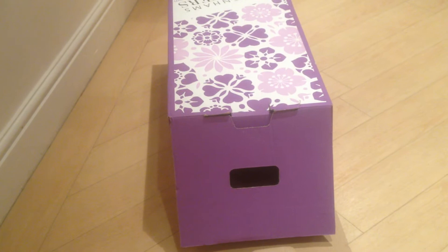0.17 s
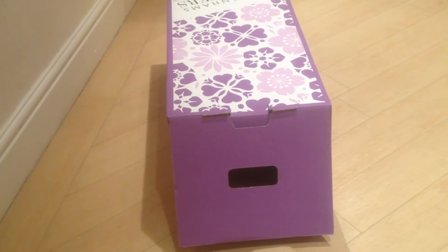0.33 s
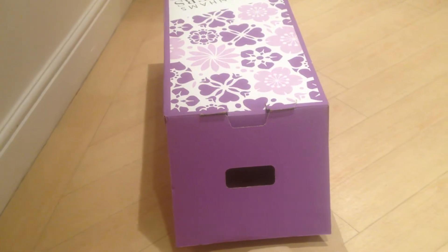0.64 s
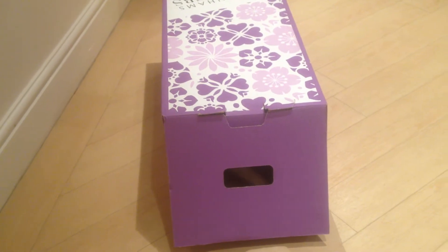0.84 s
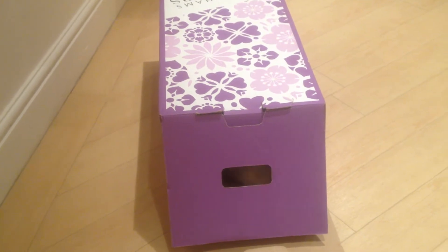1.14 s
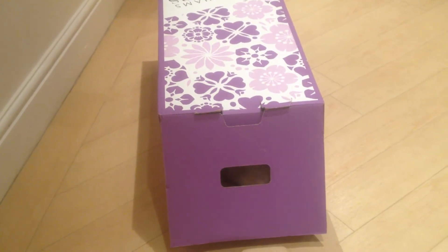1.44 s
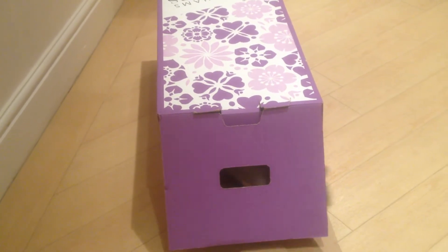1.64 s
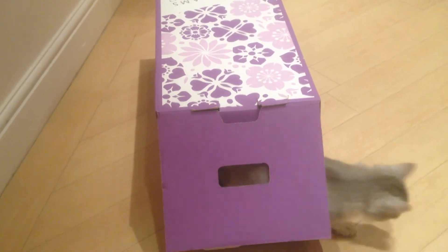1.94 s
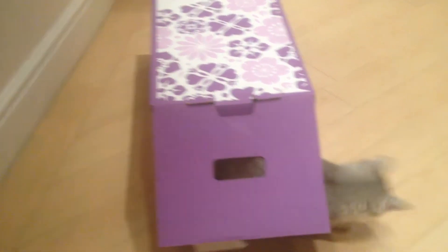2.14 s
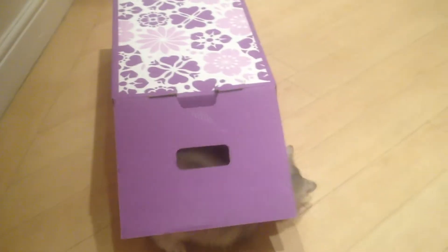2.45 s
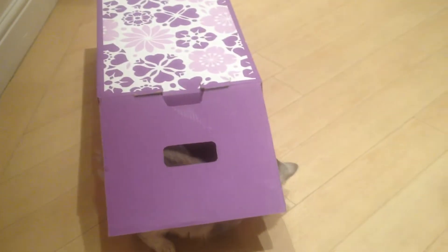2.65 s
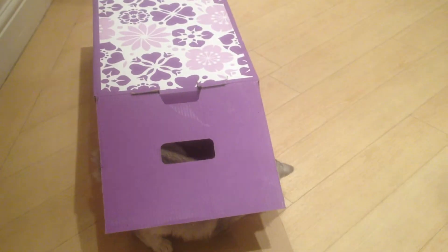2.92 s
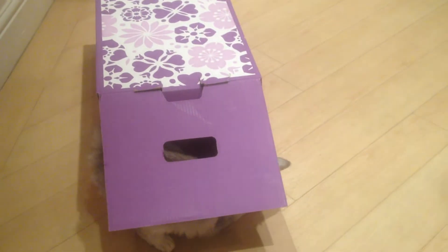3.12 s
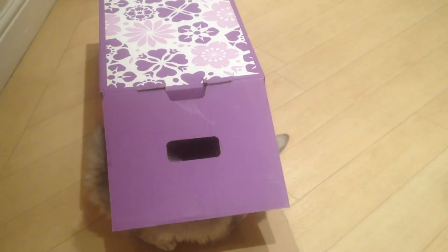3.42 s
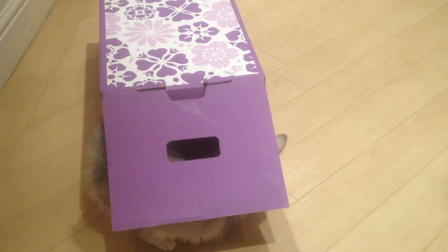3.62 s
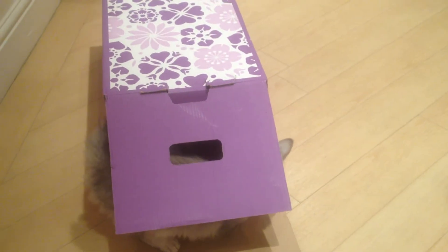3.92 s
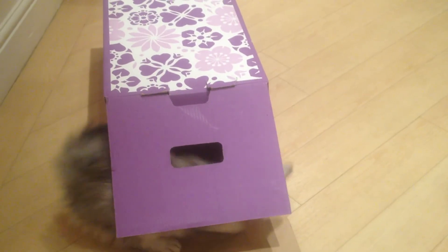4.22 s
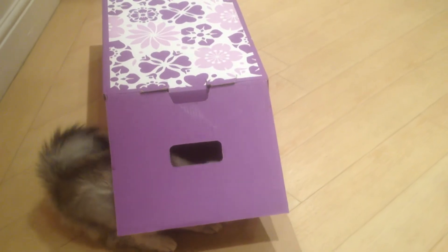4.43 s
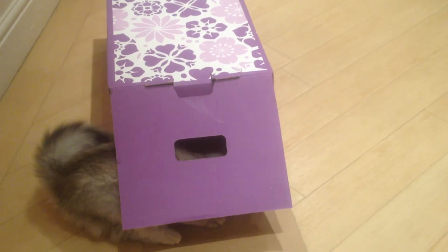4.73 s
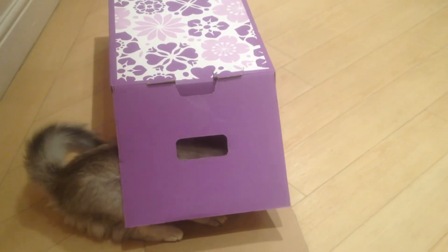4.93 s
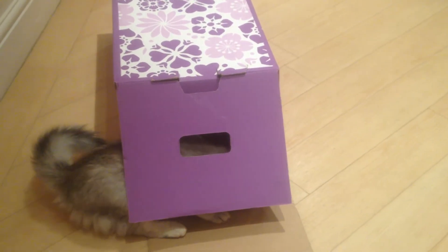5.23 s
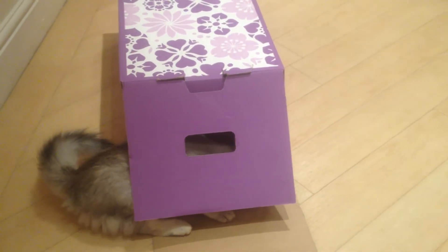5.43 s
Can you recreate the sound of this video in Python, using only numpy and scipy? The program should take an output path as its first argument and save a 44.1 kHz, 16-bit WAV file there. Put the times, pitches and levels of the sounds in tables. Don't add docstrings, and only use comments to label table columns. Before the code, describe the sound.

A cat scuffs and bumps a hollow cardboard box on a wooden floor, with claw ticks and scratches over a faint low hum.

```python
import sys
import numpy as np
from scipy import signal
from scipy.fft import rfft, irfft, next_fast_len
from scipy.io import wavfile

SR = 44100
rng = np.random.default_rng(int(sys.argv[2]) if len(sys.argv) > 2 else 0)


def generate_wav(sig):
    pcm = np.round(np.clip(np.atleast_2d(sig).T, -1, 1) * 32767).astype(np.int16)
    wavfile.write(sys.argv[1], SR, pcm)


def volts(x):
    e = np.asarray(x, float) / 20
    return 10 ** e


N = 245501

# (f/Hz, level/dB, t60/s)
CARD = [(528, -4, .06), (840, -4, .045), (1190, -2, .035), (1265, -4, .03), (2260, -3, .025),
        (2750, -2, .025)]
LIGHT_MOVE_DB = -60
CONTROL_STEP = 8


def in_time(rows):
    s, *columns = np.transpose(rows)
    return [np.interp(np.arange(N) / SR, s, column) for column in columns]


def at_hz(points, hz):
    point_hz, value = np.transpose(points)
    return np.interp(np.log(hz + 1e-9), np.log(point_hz), value)


def rms_one(x):
    return x / np.sqrt(np.mean(x ** 2) + 1e-20)


def band(x, low_hz, high_hz):
    edges = [low_hz, min(high_hz, .45 * SR)]
    return signal.sosfilt(signal.butter(2, edges, "band", fs=SR, output="sos"), x)


def resonance(x, hz, width_hz):
    r = np.exp(-np.pi * width_hz / SR)
    feed = np.array([1, 0, -1]) * (1 - r * r) / 2
    return signal.lfilter(feed, [1, -2 * r * np.cos(2 * np.pi * hz / SR), r * r], x)


def drift(rate_hz):
    r = np.exp(-2 * np.pi * rate_hz / SR)
    wander = signal.lfilter([1], [1, -2 * r, r * r], rng.standard_normal(N + SR))
    return rms_one(wander[SR:])


def dying(t60, size=8192):
    return volts(-60 * np.arange(size) / SR / max(t60, 1e-3))


def add(out, s, sound, db):
    i = round(s * SR)
    out[i:i + len(sound)] += (volts(db) * sound / np.abs(sound).max())[:N - i]


def note(hz, t60):
    return dying(t60) * np.sin(2 * np.pi * hz * np.arange(8192) / SR)


def struck(modes, pitch=1):
    strengths_db = 2.5 * rng.standard_normal(len(modes))
    return sum(volts(db + own_db) * note(hz * pitch, t60)
               for (hz, db, t60), own_db in zip(modes, strengths_db))


def crack(t60):
    return band(rng.standard_normal(8192) * dying(t60), 4000, 11500)


def grains(per_s, spread_db):
    sizes = volts(spread_db * np.minimum(rng.exponential(1, N), 4)) * rng.choice([-1, 1], N)
    clicks = sizes * (rng.random(N) < per_s / SR)
    return rms_one(clicks * volts(1.2 * drift(40)))


def walls(x):
    # (f/Hz, width/Hz, level/dB)
    wall_modes = [(300, 37, 15), (583, 16, 1), (910, 360, -7.5), (1082, 6.7, 6), (1300, 51, -6),
                  (1530, 17, 8), (1760, 20, -41), (1770, 5.4, -29), (2580, 590, -9), (2790, 22, -23)]
    narrowest_hz = 60
    return sum((-1) ** k * volts(db) * resonance(x, hz, max(width, narrowest_hz))
               for k, (hz, width, db) in enumerate(wall_modes))


def echoed(x):
    # (lag/s, level/dB)
    floor_echoes = [(.0034, -6), (.0065, -12)]
    return x + sum(volts(db) * np.roll(x, round(lag * SR)) for lag, db in floor_echoes)


def background():
    # (f/Hz, level per Hz/dB)
    air_spectrum = [(40, -54), (64, -26), (110, -20), (250, -15), (370, -21), (500, -18.5), (660, -29),
                    (1050, -28), (1550, -30), (2700, -31.5), (5000, -38), (9000, -43), (11000, -50.5),
                    (15500, -42.5)]
    # (f/Hz, width/Hz, level/dB)
    room_modes = [(82.8, 8.4, -72), (132.5, 24, -64.5), (206.5, 29, -66.5), (219.9, 5.4, -72),
                  (287.5, 47, -61.5), (350.8, 7.1, -74)]
    # (f/Hz, rms level/dB, wander/Hz)
    hum_lines = [(277.7, -54.5, 4.06), (1398, -79, 4.6), (1517, -74.5, 10), (1540, -76.5, 14.05)]
    air_db, flutter_db = -63.5, 0.9
    size = next_fast_len(N)
    hz = np.arange(size // 2 + 1) * SR / size
    white = rfft(rng.standard_normal(size))
    air = irfft(white * volts(at_hz(air_spectrum, hz)), size)[:N]
    out = volts(air_db) * air / np.std(band(air, 357, 14000))
    for mode_hz, width, db in room_modes:
        rumble = resonance(rng.standard_normal(N), mode_hz, width)
        out = out + volts(db) * rms_one(resonance(rumble, mode_hz, width))
    for line_hz, db, wander in hum_lines:
        phase = 2 * np.pi * np.cumsum(line_hz + wander * 0.287 * drift(5.28)) / SR
        out = out + np.sqrt(2) * volts(db + flutter_db * drift(5.9)) * np.sin(phase)
    return out


def moves():
    # (t/s, level/dB, speed/0-1)
    stir = [(0.9, -77, 0.5), (1.14, -62, 0.35), (1.35, -67, 0.1), (1.69, -62.5, 0.54), (1.9, -60.5, 0.4),
            (2.13, -65.5, 0.48), (2.32, -56.5, 0.54), (2.43, -63, 0.8), (2.84, -63.5, 0.12),
            (3.19, -61.5, 0.6), (3.72, -61, 0.44), (4.03, -82, 0.63), (4.28, -62.5, 0.63),
            (4.7, -72.5, 0.5), (4.74, -52.5, 0.22), (5.16, -52.5, 0.44), (5.32, -64, 0.5),
            (5.567, -89, 0.8)]
    # (t/s, peak/dB, t60/s, weight on the walls/dB, speed/0-1)
    shoves = [
        (1.172, -43, 0.72, -1.5, 0.3),
        (1.36, -42.5, 0.43, 5, 0.57),
        (2.437, -45, 0.24, 0, 1),
        (2.466, -55.5, 0.81, 5, 1),
        (2.628, -50, 0.91, 0.5, 0.08),
        (3.226, -47, 0.45, 13.5, 0.63),
        (4.719, -50, 0.093, 13, 0.5),
        (5.332, -49.5, 0.64, 6, 0.98),
    ]
    # (peak t/s, peak/dB, swell/s, weight on the walls/dB, speed/0-1, above 1 fur)
    slides = [(1.508, -37, 0.066, -30, 0.71), (1.5, -72, 0.026, 6, 0.65), (2.862, -67, 0.027, 13, 0.6),
              (3.46, -50, 0.19, 2.5, 0.26), (4.13, -75.5, 0.049, -5, 2), (4.24, -81, 0.078, -8.5, 1.9),
              (2.93, -64, 0.075, 9.5, 1.13), (2.9, -83, 0.05, -7.5, 1.8), (2.4, -72, 0.052, -7, 1),
              (3.4, -67.5, 0.044, 0, 1.7), (3.4, -77, 0.031, 3, 2.1), (4.685, -77, 0.0059, -5, 2.2),
              (1.3, -67, 0.008, -5, 1.5), (4.393, -61.5, 0.03, 8, 1.7), (6.2, -57, 0.035, 2, 0.98),
              (5.5, -76, 0.11, -10, 1.8), (6.3, -72, 0.092, -10, 2.2), (3.91, -80, .04, -10, 2.1),
              (4.26, -79, .03, -10, 1.9), (4.48, -60, 0.079, 5.5, 0.45), (1.3, -56, 0.011, -8, 0.18),
              (2.23, -69, 0.033, -10, 1.9), (2.445, -62, 0.018, -10, 2.6), (4.4, -70, .008, -10, 2.2),
              (4.378, -70, .004, -10, 2.2), (1.478, -51, 0.014, -13, 0.58), (1.522, -53, .01, -15, 0.56),
              (1.8, -56, 0.0097, -19, 0.36)]
    stir_weight_db, shove_attack_s, fade_per_swell = 4, 0.0053, 1.62
    t = np.arange(0, N, CONTROL_STEP) / SR
    stir_db, stir_speed = np.array(in_time(stir))[:, ::CONTROL_STEP]
    fade_in_db = -80 * np.clip(1 - (t - stir[0][0]) / 0.043, 0, 1)
    yield stir_db + fade_in_db, 0, stir_weight_db, stir_speed
    for s, db, t60, weight_db, speed in shoves:
        attack_db = 20 * np.log10(np.clip((t - s) / shove_attack_s, 1e-5, 1))
        fall_db = 60 * np.maximum(t - s, 0) / t60
        yield db + attack_db, fall_db, weight_db, speed
    for s, db, swell, weight_db, speed in slides:
        fall_db = 10 * np.where(t < s, ((s - t) / swell) ** 2, (t - s) / swell / fade_per_swell)
        yield db, fall_db, weight_db, speed


def rubbing():
    # (t/s, level/dB)
    drag_curve = [(4.715, -95), (4.725, -54.5), (4.85, -53), (5.0, -58.5), (5.15, -64), (5.26, -61),
                  (5.31, -84), (5.335, -55), (5.45, -87), (5.56, -90)]
    fur_level_db, fur_db_per_speed = -11, 9
    walls_die, fur_dies = 0.95, 1.21
    fur_follows, tips_follow, tips_db = 0.69, 0.28, -5
    power = np.zeros((5, len(range(0, N, CONTROL_STEP))))
    for db, fall_db, weight_db, speed in moves():
        wall = volts(db + weight_db - walls_die * fall_db - 7.5) ** 2
        scuff = volts(db - fall_db - 0.5) ** 2
        fur_db = LIGHT_MOVE_DB + fur_level_db + fur_db_per_speed * speed - fur_dies * fall_db
        over_db = db - LIGHT_MOVE_DB
        fur = volts(fur_db + np.minimum(over_db, fur_follows * over_db)) ** 2
        fine = volts(fur_db + tips_db + np.minimum(over_db, tips_follow * over_db)) ** 2
        speed = np.clip(speed, 0, 1)
        power += [wall, (1 - speed) * scuff, speed * scuff, fur, fine]
    power = np.repeat(power, CONTROL_STEP, axis=1)[:, :N]
    rumble = band(grains(3000, 3.0), 293, 1770)
    shaken = rms_one(rumble + 0.66 * walls(rumble))
    fibres = grains(9000, 2.0)
    slow = rms_one(band(band(fibres, 1425, 3420), 670, 3680))
    fast = rms_one(band(band(fibres, 1840, 4920), 1670, 5300))
    hiss = rms_one(band(band(grains(14000, 2.1), 5340, 9170), 2800, 18000))
    tips = rms_one(band(grains(12000, 3.0), 10000, 15800))
    drag = rms_one(sum(volts(db) * resonance(fibres, hz, 230) for hz, db, _ in CARD))
    rubbed = np.sum(np.sqrt(power) * [shaken, slow, fast, hiss, tips], axis=0)
    return volts(in_time(drag_curve)[0]) * drag + rubbed


def squeaks():
    # (t/s, level/dB, f/Hz, length/s, width/Hz)
    slip_events = [(2.311, -55.5, 1620, 0.044, 200), (3.498, -54.5, 1776, 0.13, 200),
                   (3.735, -59, 1675, 0.12, 160), (1.01, -61.5, 4870, 0.025, 5000),
                   (1.245, -64, 10500, 0.0067, 6000), (1.597, -63, 9900, 0.022, 8000),
                   (1.912, -57.5, 7000, 0.026, 8000), (2.214, -55, 6070, 0.04, 7100),
                   (3.388, -54.5, 7900, 0.11, 5074), (4.101, -63.5, 4536, 0.052, 1500),
                   (4.333, -53.5, 4300, 0.037, 1530), (4.383, -54, 5000, 0.022, 5000),
                   (4.449, -61, 7750, 0.073, 3000), (1.103, -62, 3080, 0.045, 700)]
    out = np.zeros(N)
    t = np.arange(16384) / SR
    for s, db, hz, length, width in slip_events:
        shape = np.clip(t / 0.0085, 0, 1) * np.exp(-(t / length) ** 1.1)
        slips = resonance(resonance(rng.laplace(size=len(t)), hz, width), hz, width)
        add(out, s, shape * slips, db + 8.5)
    return out


def notes():
    # (t/s,
    # peak/dB, f/Hz, t60/s)
    panel_notes = [(1.102, -49.5, 3150, .02), (1.1015, -51, 4300, 0.013), (1.171, -43, 2510, 0.098),
                   (1.172, -54, 3540, 0.048), (1.176, -46, 2790, .15), (1.176, -48, 3030, 0.064),
                   (1.18, -45.5, 1900, 0.13), (1.364, -39.5, 1021, 0.13), (1.372, -43, 828, 0.093),
                   (1.372, -43.5, 1090, .08), (1.393, -43, 880, 0.038), (1.364, -36, 1210, 0.032),
                   (1.365, -44, 2470, 0.046), (1.365, -40.5, 2990, 0.037), (1.395, -42, 2470, 0.054),
                   (1.395, -46, 3350, 0.046), (2.463, -35.5, 139, .2), (2.628, -41.5, 2230, 0.058),
                   (2.63, -43, 2000, .04), (2.63, -47, 1130, 0.035), (2.632, -50.5, 760, .05),
                   (2.628, -45, 4560, 0.027), (2.628, -54, 3400, .02), (2.628, -46, 3950, .02),
                   (2.865, -51.5, 1360, 0.11), (2.897, -55, 1500, 0.055), (2.897, -53, 2100, .06),
                   (3.229, -34, 1100, .04), (3.236, -47, 4000, .03), (3.27, -50, 2800, .03),
                  (3.226, -30.5, 550, .03), (3.23, -36.5, 450, 0.12), (3.238, -31, 880, 0.074),
                  (3.237, -34, 1440, .05), (3.255, -44, 1800, 0.05), (3.234, -34, 560, 0.048),
                  (3.237, -35, 1770, 0.052), (3.237, -40, 2950, 0.054), (3.273, -36, 1300, 0.16),
                  (3.28, -34, 1010, .08), (3.243, -35.5, 280, 0.18), (3.321, -44, 1150, 0.067),
                  (3.273, -48, 1530, 0.33), (3.273, -42, 2340, 0.1), (3.273, -45.5, 3300, 0.082),
                  (3.29, -37, 800, .1), (3.328, -51, 1990, 0.093), (3.35, -45, 1400, 0.092),
                  (3.385, -43.5, 730, 0.1), (3.455, -56, 1560, 0.16), (3.46, -45, 1600, 0.089),
                  (3.508, -45.5, 1860, 0.17), (3.63, -46, 2600, 0.053), (3.67, -51, 3100, 0.056),
                  (3.54, -52, 1900, 0.091), (3.635, -53, 2100, .05), (3.681, -54, 1140, .05),
                  (3.725, -48, 1700, 0.1), (3.735, -52, 1800, 0.049), (3.73, -53, 1080, 0.045)]
    out = np.zeros(N)
    for s, db, hz, t60 in panel_notes:
        add(out, s, note(hz, t60), db)
    return band(out, 100, 12000)


def taps():
    # (t/s, peak/dB, centre f/Hz)
    contacts = [(1.1716, -36, 2580), (1.1852, -43, 2800), (1.3639, -42, 2200), (1.3973, -39, 2200),
                (1.4415, -40, 1940), (1.1022, -49, 3300), (1.4975, -29, 4000), (1.5075, -34, 3300),
                (1.511, -29, 3270), (1.5218, -33, 3500), (1.5247, -25.5, 3100), (1.5366, -26, 3920),
                (2.4495, -43, 3100), (2.627, -30.5, 2700), (2.66, -43, 1970), (3.2264, -26.5, 1700),
                (3.2298, -25, 830), (3.2346, -29, 900), (3.237, -22.5, 1800), (3.244, -34, 1400),
                (3.25, -32, 1900), (3.265, -35, 1800), (3.274, -31, 1990), (3.2787, -37, 2300),
                (3.2885, -36, 2500), (3.3054, -38, 2100), (3.3327, -33, 1700), (4.3188, -53, 2700),
                (4.355, -45, 3900), (4.3751, -41, 7000), (4.3785, -39, 5460), (4.3847, -37, 5400),
                (4.391, -41, 4230), (4.3937, -45, 4600), (4.4003, -39, 4800), (4.4038, -37, 3320),
                (4.455, -49, 3800), (4.7268, -36, 2200), (4.777, -46, 2700), (4.788, -47, 2600),
                (4.8325, -39, 2800), (4.9099, -44, 3400), (4.9518, -47, 2700), (4.9727, -49, 2900),
                (5.0206, -46, 2500), (5.0325, -43, 3100), (5.069, -47, 2370), (5.0777, -39, 3800),
                (5.0838, -45, 3850), (5.1374, -41, 2900), (5.339, -40, 2800), (5.345, -48, 3100),
                (5.3627, -48, 4100)]
    spread = 1.41
    out = np.zeros(N)
    for s, db, hz in contacts:
        push = -band(dying(0.0019, size=1024), hz / spread, hz * spread)
        add(out, s, push, db)
    return echoed(out)


def knocks():
    # (t/s, peak/dB, centre f/Hz, chatter t60/s, crack level/dB)
    blows = [(2.6277, -48, 910, 0.11, -60), (1.169, -35, 2660, 0.28, -43), (1.205, -37, 1870, 0.17, -48),
             (1.3626, -50, 1300, 0.086, -45), (1.942, -47.5, 1670, 0.069, -48),
             (2.034, -60, 1510, 0.05, -45), (2.324, -48, 1640, 0.21, -42.5), (2.628, -41, 2400, 0.1, -58),
             (2.832, -45.5, 2300, 0.52, -65), (3.2242, -27, 1460, 0.073, -57), (3.23, -26, 830, 0.41, -62),
             (3.2358, -32, 1480, 0.092, -46), (3.244, -45, 520, 0.053, -54),
             (3.249, -32.5, 1200, 0.29, -58), (3.24, -42, 3080, 0.27, -50), (3.272, -33, 1590, 0.63, -58),
             (3.479, -39, 2141, 0.26, -44), (3.511, -37, 2670, 0.16, -44), (4.317, -45.5, 1500, 0.099, -60),
             (4.377, -42, 4900, 0.12, -39), (4.386, -43.5, 2580, 0.15, -44), (4.47, -49, 960, 0.66, -57),
             (4.612, -46, 1830, 0.098, -68)]
    spread, narrowing = 1.5, 0.049
    first_touch = 3.5
    out = np.zeros(N)
    for s, db, hz, t60, crack_db in blows:
        width = max(spread - narrowing * np.log2(hz / 1000), 1.05)
        low, high = hz / width, hz * width
        chatter = rng.laplace(size=8192) * dying(t60) + first_touch * dying(0.0016)
        spot = band(band(chatter, low, high), low / 1.63, high * 2.3)
        add(out, s, spot + .8 * walls(spot), db - 1.5)
        add(out, s, crack(0.93 * t60), crack_db - 8.5)
    return out


def thuds():
    # (t/s, peak/dB, pitch/Hz, ring length/share of the free ring)
    landings = [(1.199, -40.5, 272, 0.89), (1.311, -43, 254, 1.01), (1.364, -33, 279, 1),
                (1.389, -43, 260, 0.85), (2.297, -42.5, 272, 0.91), (2.46, -24, 242, 0.36),
                (2.473, -33, 207, 0.45), (2.489, -31, 280, 0.3), (2.504, -31, 230, 0.43),
                (2.5234, -29, 262, 0.35), (2.539, -31, 263, 0.37), (2.632, -34.5, 223, .6),
                (2.655, -45, 244, 0.37), (2.55, -42, 290, .3), (2.575, -48, 337, .45),
                (3.229, -33.5, 285, 0.87), (3.512, -41, 229, 0.8), (3.562, -40, 300, 0.82),
                (4.8, -41.5, 250, 1.6), (4.869, -37.5, 255, 1.3), (5.329, -40, 258.6, 1.01)]
    # (f/ratio to pitch, level/dB, t60/s)
    boom = [(.65, -6, 0.086), (1, 0.5, 0.13), (1.3, -5.5, 0.034), (1.9, -21.5, 0.043)]
    out = np.zeros(N)
    rise = 1 - dying(0.017)
    for s, db, hz, share in landings:
        damped = [(ratio, mode_db, share * t60) for ratio, mode_db, t60 in boom]
        add(out, s, band(rise * struck(damped, pitch=hz), 139, 500), db - 4.5)
    return out


def ticks():
    # (t/s, peak/dB, crack level/dB, panel ring level/dB)
    releases = [(2.4343, -20, -36, -58), (4.7154, -21, -40, -32.5), (4.7654, -36, -52, -37.5),
                (4.795, -26.5, -48, -42), (4.8048, -30, -47, -39.5), (4.8306, -42, -49, -43),
                (4.870, -36, -45, -40), (4.8893, -26.5, -40, -38.5), (4.9288, -28.5, -49, -43),
                (4.9814, -37, -45, -46), (5.0058, -28, -38, -43), (5.0529, -27.5, -31, -42),
                (5.1144, -46, -43, -42), (5.1405, -52, -54, -43.5), (5.1637, -32, -39.5, -43),
                (5.2096, -28.5, -35, -45), (5.3293, -23.5, -29, -36.5)]
    # (f/Hz, level/dB, t60/s)
    snap = [(2160, -8, 0.0019), (2776, 12, 0.015), (4000, -20, 0.0012), (4600, 7, 0.00099)]
    # (f/Hz, level/dB, t60/s)
    fibre_modes = [(2250, -5, 0.049), (2780, -5, .025), (3220, -12.5, 0.016), (4300, 4, 0.018),
                   (4940, -7, 0.0074), (6370, 4, 0.0055)]
    out, tips = np.zeros(N), np.zeros(N)
    pluck = sum(volts(db) * note(hz, t60) for hz, db, t60 in fibre_modes)
    point = band(band(dying(.0004), 1830, 5500), 1500, 7000)
    tip = 2.5 * band(dying(.0001), 5500, 14500)
    for s, db, crack_db, ring_db in releases:
        add(out, s, band(band(struck(snap), 1900, 6000), 1700, 11000), db - 10.0)
        add(out, s, pluck, db - 12.5)
        judder = rng.laplace(size=8192) * dying(.035)
        add(out, s, band(judder, 2200, 3600), db - 15)
        add(out, s, band(struck(CARD), 410, 6100), ring_db + 2)
        add(out, s - .00016, -point, db - 3.5)
        add(tips, s + .001, tip + crack(0.008) + 0.35 * crack(0.034), crack_db + 1.0)
    return echoed(out) + tips


def room(x):
    # (f/Hz, t60/s)
    room_t60 = [(200, 0.6), (1000, 0.71), (4000, 0.44), (12000, 0.34)]
    edges = 90 * 2. ** np.arange(8.5)
    white = rng.standard_normal(SR)
    tail = sum(band(white, low, high) * dying(at_hz(room_t60, low), size=SR)
               for low, high in zip(edges, edges[1:]))
    tail = tail * (1 - dying(0.0062, size=SR))
    return signal.fftconvolve(x, tail / np.linalg.norm(tail))[:N]


def scene():
    hits = ticks() + taps() + notes() + knocks() + thuds()
    room_db = -7.5
    mono = hits + volts(room_db) * room(hits) + rubbing() + squeaks() + background()
    return np.array([mono, mono])


def low_pass(x):
    return signal.sosfilt(signal.butter(12, 15640, fs=SR, output="sos"), x)


def record(dry):
    dry = signal.sosfilt(signal.butter(2, 60, "high", fs=SR, output="sos"), dry)
    dry = dry + volts(-92.5) * rms_one(band(rng.standard_normal(N), 30, 60))
    dry = signal.sosfilt(signal.cheby2(12, 50, 15820, fs=SR, output="sos"), dry)
    return low_pass(dry)


dry = scene()
out = record(dry)
generate_wav(out)
```